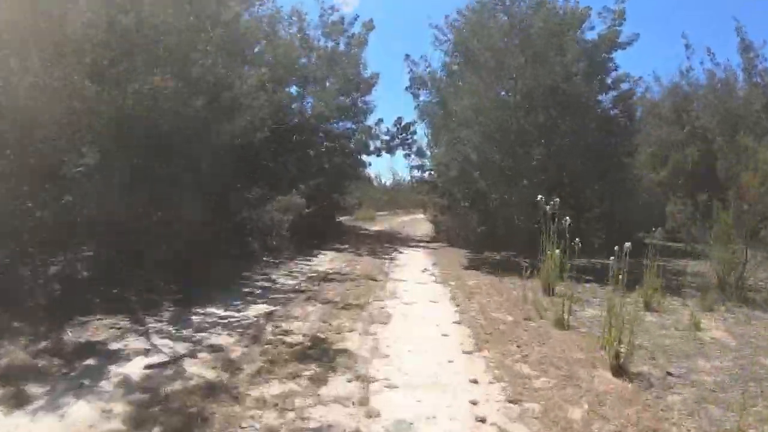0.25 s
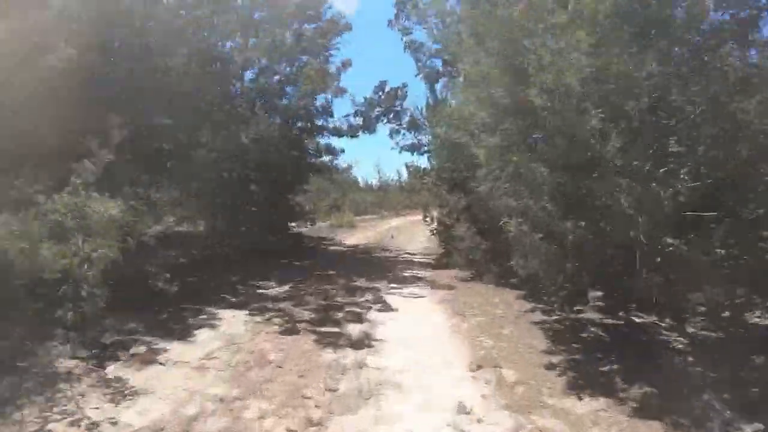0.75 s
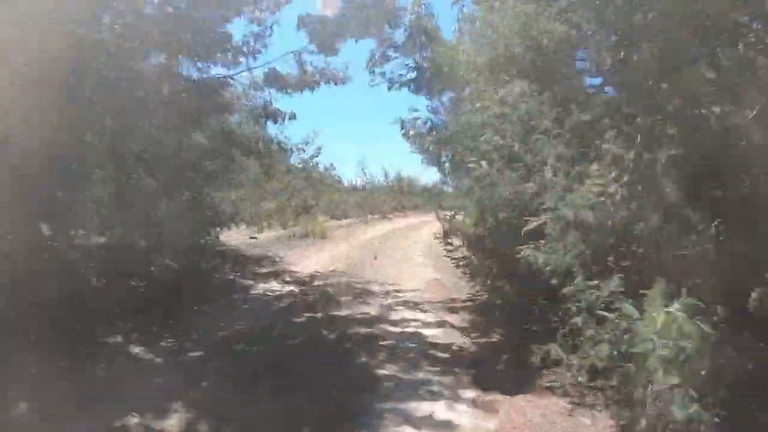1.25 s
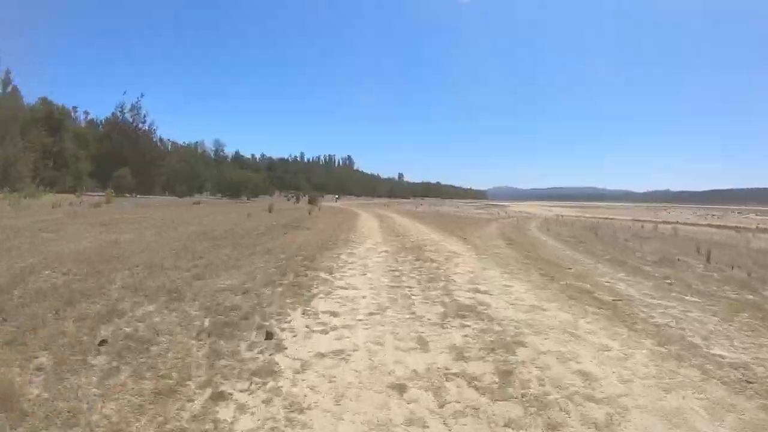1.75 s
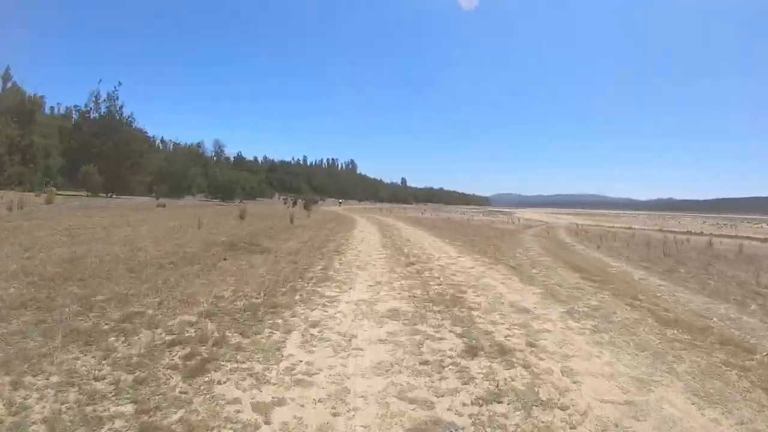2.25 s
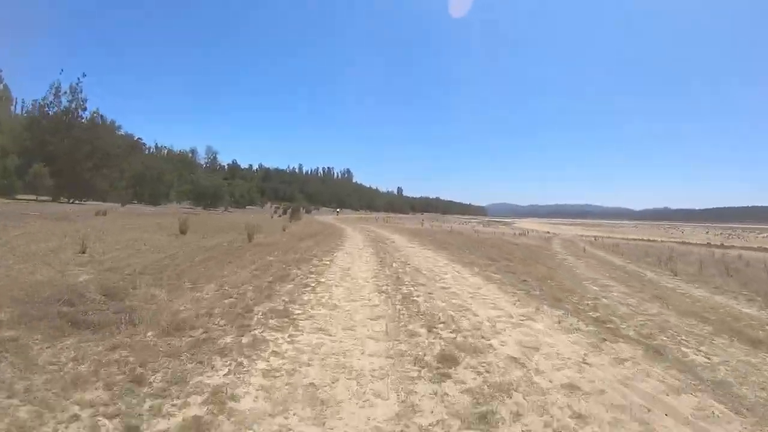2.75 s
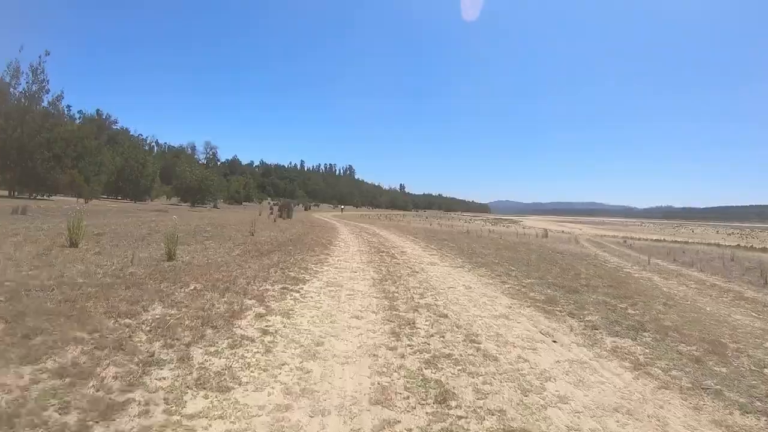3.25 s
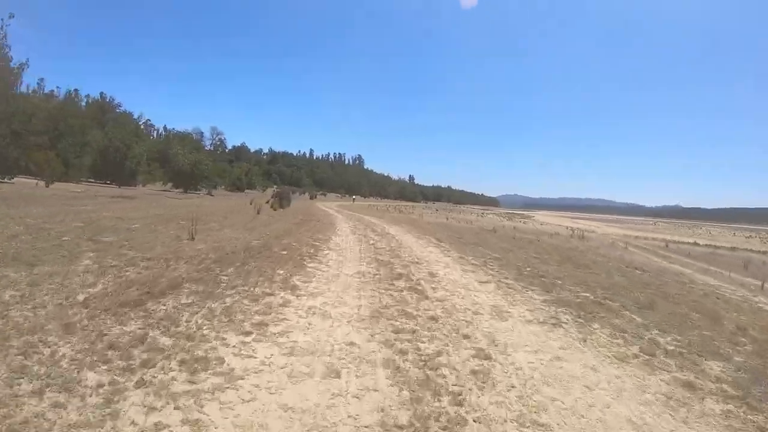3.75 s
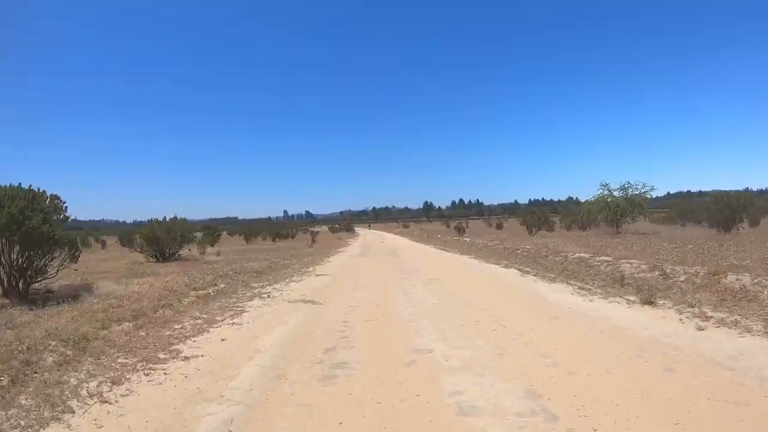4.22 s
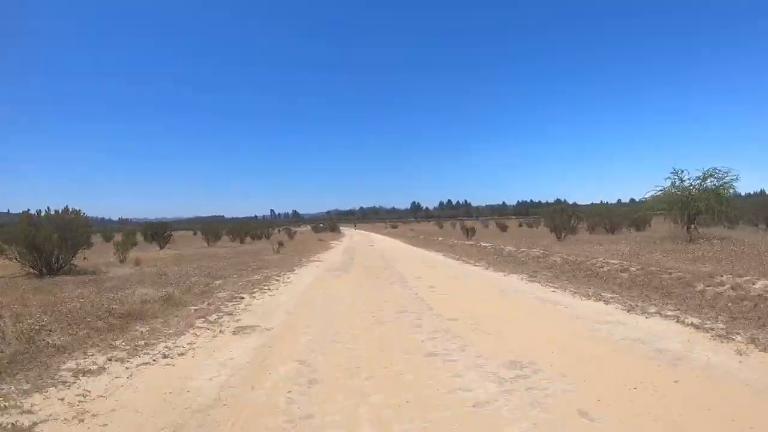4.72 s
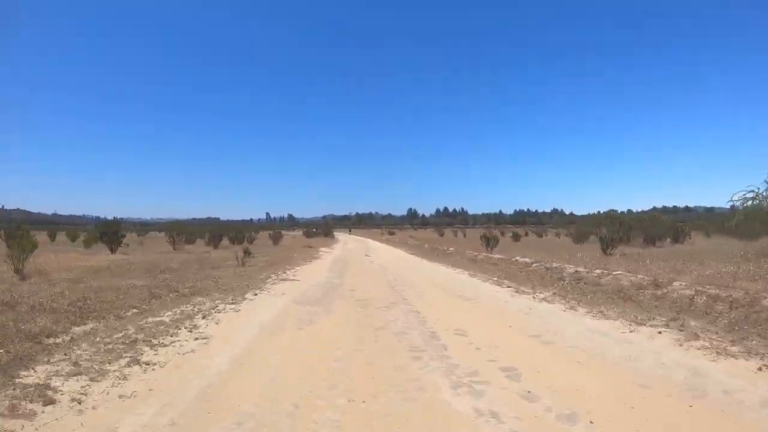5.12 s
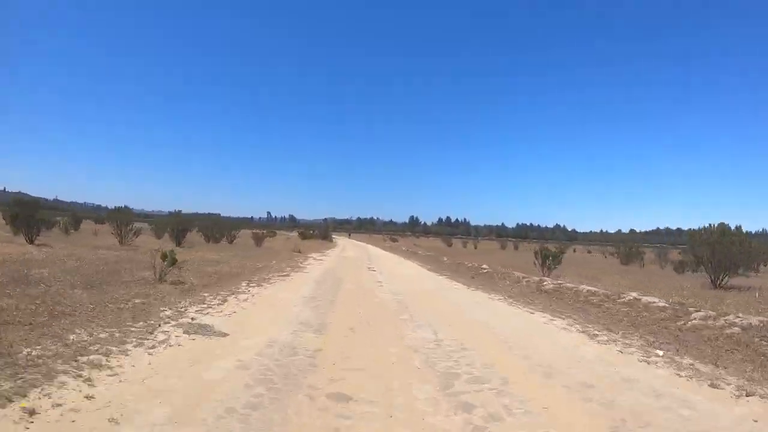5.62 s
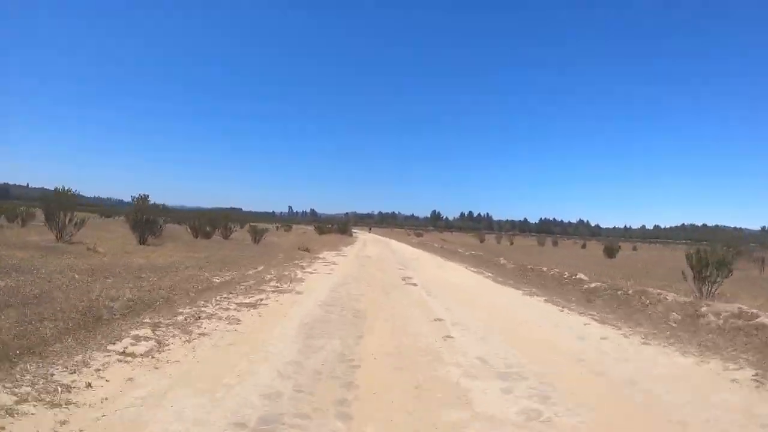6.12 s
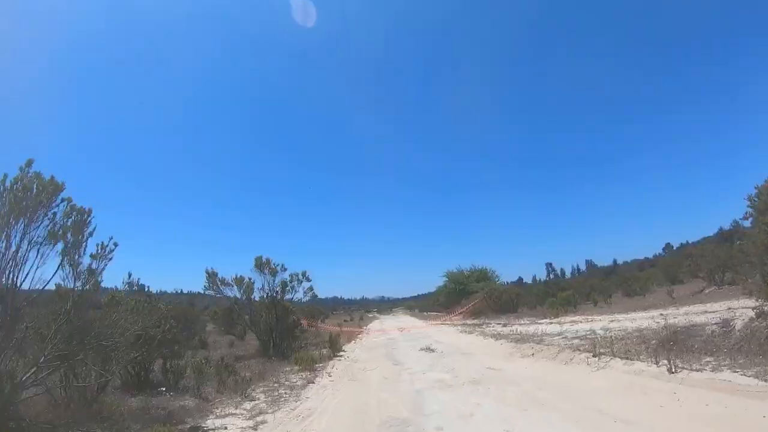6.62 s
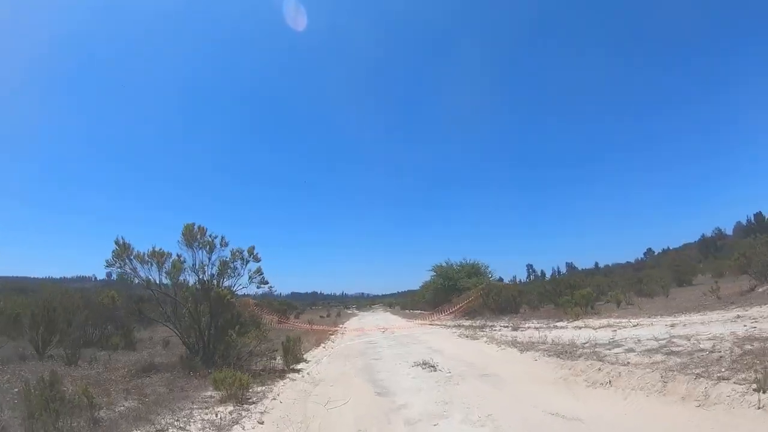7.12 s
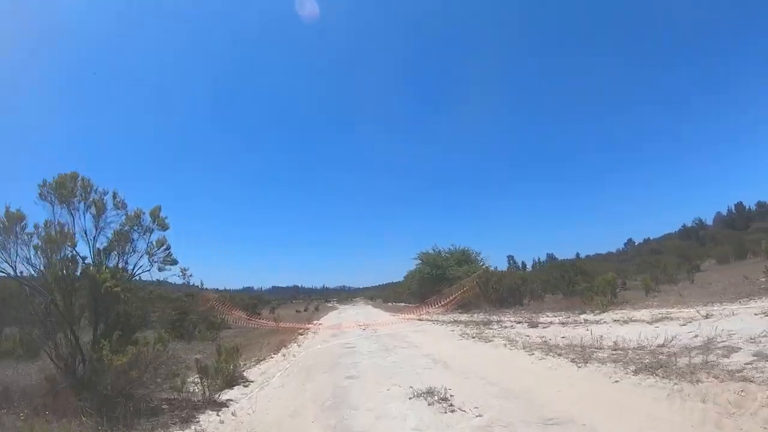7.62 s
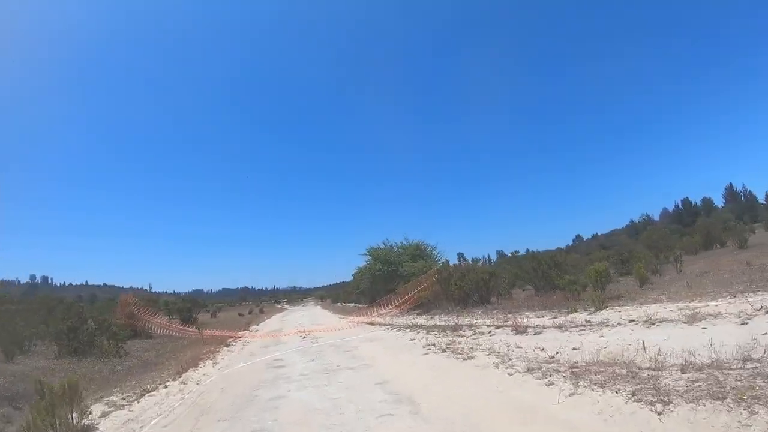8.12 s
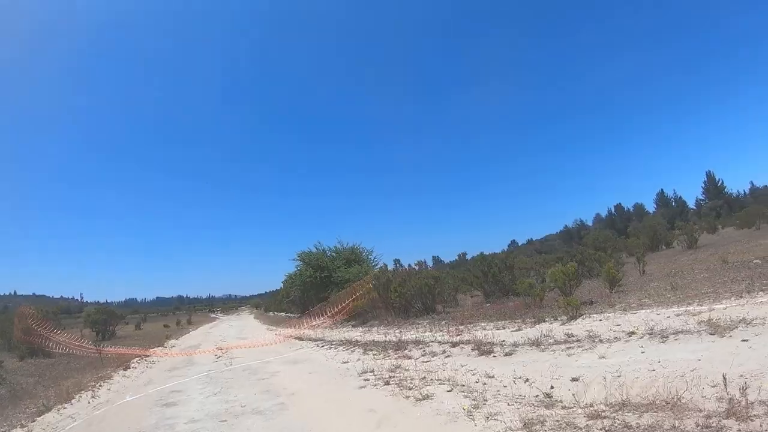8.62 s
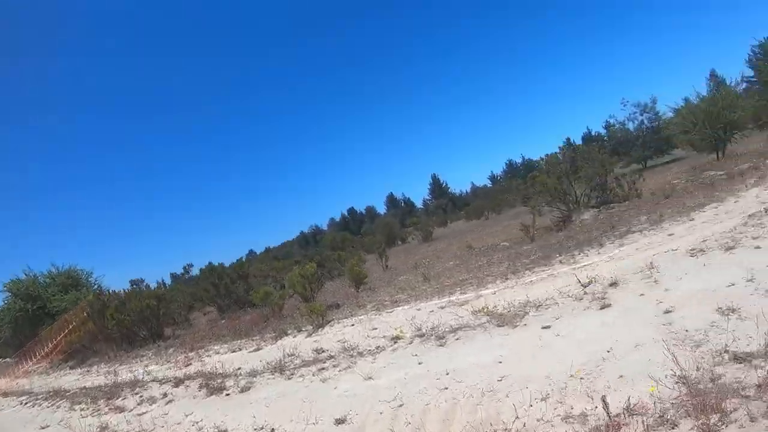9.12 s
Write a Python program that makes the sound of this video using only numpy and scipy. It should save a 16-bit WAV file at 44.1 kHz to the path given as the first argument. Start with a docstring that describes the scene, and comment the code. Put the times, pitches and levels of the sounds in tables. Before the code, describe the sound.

A bicycle rolls over dirt and gravel, tyres booming and frame rattling, stones snapping sharply under the wheels while wind buffets the microphone.

```python
"""A knock and the snap of stones come first, over the boom of tyres and a crunch of gravel.
A bicycle rolls over dirt, sand and gravel, heard from the bicycle itself, with wind in the microphone.
Random small contacts set the tyres, frame, pebbles and grit ringing; listed bumps and stones stand out.
Wind, sand hiss and a bright sizzle are shaped noise; the hum, thin high bands and drones are narrow noise.
A shared shaking curve makes the ground sounds swell together."""
import sys
import numpy as np
from scipy import signal
from scipy.fft import rfft, irfft, next_fast_len
from scipy.io import wavfile
from scipy.ndimage import uniform_filter1d, map_coordinates

SR = 44100
rng = np.random.default_rng(int(sys.argv[2]) if len(sys.argv) > 2 else 0)


def output_pcm(signal):
    """Save a mono or channel-first signal as 16-bit PCM at the path in sys.argv[1].

    Samples are clipped to [-1, 1] before scaling.
    """
    pcm = np.clip(np.atleast_2d(signal).T, -1, 1) * 32767
    wavfile.write(sys.argv[1], SR, np.round(pcm).astype(np.int16))


N = 412769

# Colour of the faint hiss of the air. Each row: pitch in Hz, relative level in dB.
AIR_COLOUR = [(760, -20), (1100, 0), (1600, 6.5), (2150, 3.5), (2800, -8.5), (3200, -8), (3600, -2.5),
              (4600, 2), (5300, -14.5), (5800, -19), (6900, -31), (7800, -28), (9000, -42), (15400, -84.5)]
# Loudness of that hiss before its flutter. Each row: time in seconds, level in dB.
AIR_LEVEL = [(8.4, -57), (8.85, -53), (9.15, -56.5)]
# Colour of the deep wind buffeting. Each row: pitch in Hz, relative level in dB.
BUFFET_COLOUR = [(12, 5), (25, 2.5), (42, 6), (62, 3.5), (95, -4.5), (200, -12), (400, -65.5)]
# Colour of the higher wind rush. Each row: pitch in Hz, relative level in dB.
RUSH_COLOUR = [(100, -11), (180, -2), (260, -4.5), (400, -11), (640, -18), (800, -43.5), (1200, -34),
               (2500, -56)]
# Deep drones. Each row: start and end in seconds, centre in Hz, width in Hz, level in dB before flicker.
DRONES = [(7.75, 8.58, 158, 24, -34), (8.14, 8.37, 47, 10, -34), (8.55, 8.92, 51, 11, -34)]
# Faint, thin high bands of noise. Each row: start and end in seconds, centre in Hz, width in Hz,
# level in dB before flicker.
THIN_BANDS = [(.95, 2.4, 6200, 300, -61), (7.32, 8.4, 6200, 300, -60.5), (7.1, 8.1, 5370, 150, -64),
              (8.38, 8.92, 6290, 240, -61), (8.38, 8.95, 5480, 190, -62), (8.38, 8.95, 3570, 260, -63),
              (7.3, 8.6, 4300, 1100, -58.5)]
# Loudness of the bright sizzle before flicker and shaking. Each row: time in seconds, level in dB.
SIZZLE_LEVEL = [(3.96, -78), (4.0, -45.5), (6.15, -47.5), (6.45, -57), (7.3, -76)]
# Colour of the sizzle. Each row: pitch in Hz before the slow sag, relative level in dB.
SIZZLE_COLOUR = [(3450, -26), (3850, -.5), (4120, 2.5), (4500, -20), (5150, -14), (5450, -2), (5900, 2),
                 (6600, 3.5), (7000, -32)]
# Hum of the tread. Each row: time in seconds, level in dB, pitch in Hz before it wavers.
TREAD_HUM = [(7.45, -45, 366), (7.6, -30.5, 360.8), (8.3, -36.5, 334.6), (8.55, -47.5, 338),
             (8.75, -37, 347), (9.3, -42.5, 360)]
# The course of the ride, before shaking and chance. Each row: time in seconds, then levels in dB of
# tyre boom, frame rattle, crunch, wind buffeting, wind rush.
RIDE = [(0, -21.5, -30, -43.5, -26, -32), (1.1, -26, -35, -47.5, -29.5, -31.5),
        (1.6, -20, -28, -40.5, -24, -34), (3.0, -20, -31, -39, -24.5, -33),
        (3.95, -20, -29.5, -40, -23.5, -34), (4.02, -29.5, -33.5, -43, -26.5, -28),
        (4.8, -26, -26, -39, -20, -25), (5.7, -27, -24.5, -37, -20.5, -24.5),
        (6.6, -28.5, -28, -40, -22, -28.5), (7.0, -19, -34, -43, -32, -36.5),
        (7.45, -23, -30.5, -45, -31, -27), (7.6, -26.5, -38.5, -50.5, -28.5, -29),
        (8.45, -28.5, -49.5, -61.5, -41, -41), (8.7, -32, -39.5, -56, -37.5, -35),
        (9.2, -52, -45.5, -76.5, -31, -48.5), (9.3, -21.5, -36, -51.5, -21, -53)]
# Stonier (+) and smoother (-) patches. Each row: start in seconds, length in seconds,
# shaking in dB, which each sound follows in its own measure.
PATCHES = [(0.054, 0.32, -1), (0.438, 0.069, 3), (0.661, 0.276, 2.5), (1.026, 0.13, -2),
           (1.203, 0.115, 3.5), (1.909, 0.059, -10.5), (3.893, 0.089, -6), (6.712, 0.11, 3),
           (7.425, 0.096, -10.5), (8.604, .14, -9.5), (9.03, 0.056, 4.5)]
# Bumps that shake the frame. Each row: time in seconds, then levels in dB of
# frame knock, fittings clack and tyre thud, each before its share in the mix.
BUMPS = [(0.009, -16, -18.5, -20), (0.376, -12, -23.5, -18), (0.469, -12, -21, -20),
         (0.624, -15.5, -30, -33), (0.74, -9, -26, -16), (0.778, -12.5, -24, -15), (0.854, -12, -19, -35),
         (1.215, -9, -23, -20), (1.271, -9.5, -36, -24), (1.367, -11, -21.5, -25), (1.469, -25, -29, -41),
         (1.884, -10, -30, -19.5), (1.997, -14.5, -27, -26), (2.192, -15, -27, -43),
         (2.464, -11.5, -22, -26), (2.566, -20, -26, -37), (2.909, -9.5, -40.0, -23),
         (3.016, -11.5, -16.5, -38), (3.135, -11, -19, -34.5), (3.35, -10, -22, -28),
         (3.495, -16, -20, -21), (3.652, -24, -22, -19), (4.019, -10, -35, -25), (4.246, -10.5, -18, -44),
         (4.339, -12.5, -22, -28), (4.769, -10, -33, -40), (4.899, -9.5, -35.5, -37),
         (5.146, -10, -24, -39), (5.318, -11, -23, -37), (5.665, -9, -29, -18), (5.728, -18, -35, -31),
         (5.835, -13, -29, -34.0), (5.919, -25, -24, -25), (6.086, -12.5, -18, -24), (6.385, -6, -21, -37),
         (6.547, -6.5, -39.0, -19), (6.734, -12.5, -19, -16), (6.922, -14, -20, -15),
         (7.361, -14, -22, -33.0), (7.399, -18, -33, -23), (7.55, -12, -19.5, -24), (7.67, -15, -36, -45),
         (7.79, -14.5, -25, -38), (7.968, -20, -30, -42), (8.012, -16, -28, -17.5),
         (8.089, -20.0, -34, -29.5), (8.295, -13, -29, -35), (8.402, -21.5, -30, -28),
         (8.475, -22, -25.5, -36), (8.502, -19.5, -32, -28), (8.756, -19.0, -42.0, -37),
         (8.802, -30, -27, -26), (9.029, -25, -35, -28)]
# Tyre and fork resonances. Each row: pitch in Hz, strength in dB before scatter,
# time to fade by 60 dB in seconds.
TYRE_MODES = [(84, -5, 0.054), (103.2, -0.5, 0.12), (121.7, 1.5, 0.086), (151.9, -2.5, 0.1)]
# Frame resonances. Each row: pitch in Hz, strength in dB before scatter, 60 dB fade in seconds.
FRAME_MODES = [(328.6, -2, 0.037), (441, -0.5, 0.049), (529.3, 3.5, 0.042), (639.6, 2.5, 0.027),
               (905, -17, 0.0091)]
# Clack of the fittings. Each row: pitch in Hz, strength in dB before scatter, 60 dB fade in seconds.
FITTING_MODES = [(770, 5, 0.0084), (1090, 5, 0.0057), (1190, -1, 0.013), (1485, 1, 0.018), (2115, 2, 0.017)]
# Colour of the sand hiss. Each row: pitch in Hz, relative level in dB.
SAND_COLOUR = [(900, -14), (1200, 3), (1600, 6), (2200, 2), (2900, -6), (3700, -2), (4650, -1), (5200, 3.5),
               (6100, 5.5), (6900, -31), (11500, -56)]
# Larger pebbles knocked aside. Each row: time in seconds, level in dB.
PEBBLES = [(.447, -29), (.986, -28), (1.185, -29), (1.232, -27), (1.271, -24), (1.304, -25), (1.422, -28),
           (1.468, -28), (1.559, -26), (1.877, -28), (2.019, -23), (2.192, -29), (2.823, -28), (3.126, -27),
           (3.387, -28), (3.481, -26), (5.006, -26), (5.669, -17), (5.835, -16), (6.346, -29), (7.625, -32)]
# Dull pebble resonances. Each row: typical pitch in Hz, strength in dB before scatter,
# 60 dB fade in seconds.
PEBBLE_MODES = [(840, -0.5, 0.018), (1120, -11.5, 0.017), (1490, -7, 0.013), (2070, -17.5, 0.0076)]
# Loudest single grains that split. Each row: time in seconds, level in dB before its share in the mix.
GRAINS = [(0.3594, -25.5), (0.6732, -22.5), (0.751, -23), (0.7974, -18.5), (0.8579, -23), (0.9717, -27),
          (1.3027, -22), (1.3508, -19.5), (1.392, -26), (1.509, -29), (1.5638, -29), (1.5758, -22),
          (1.617, -26), (1.721, -21.5), (1.7676, -22), (1.9139, -19.5), (1.9721, -21), (2.0353, -30.5),
          (2.1211, -23.5), (2.2101, -15), (2.2622, -18.5), (2.3075, -19), (2.3632, -21.5), (2.3784, -22.5),
          (2.4693, -29), (2.597, -30), (2.7147, -19), (2.7716, -22), (2.832, -18.5), (2.8702, -21),
          (2.8772, -18), (2.9153, -24), (2.9338, -19), (3.018, -22), (3.051, -18), (3.1776, -22),
          (3.245, -23), (3.2937, -32), (3.54, -22.5), (3.5865, -22), (3.71, -18.5), (3.8058, -17),
          (3.8891, -22.5), (4.0644, -20), (4.1108, -18), (4.119, -21), (4.365, -23), (4.7511, -19),
          (4.8152, -20), (4.897, -18.5), (5.228, -17.5), (5.4535, -22), (5.4697, -21), (5.5079, -17.5),
          (5.5706, -18), (5.8888, -19), (5.9644, -15.5), (6.0593, -13.5), (6.0766, -19), (6.2936, -16),
          (6.417, -14), (6.539, -20.5), (6.6774, -21.5), (6.734, -15.5), (6.8129, -21), (6.989, -26),
          (7.1412, -22.5), (7.2476, -22), (8.033, -36), (9.0266, -35)]
# Hollow clack of a stone. Each row: typical pitch in Hz, strength in dB before scatter,
# 60 dB fade in seconds.
CLACK_MODES = [(980, -14, 0.0069), (1334, -10, 0.012), (1914, -5.5, 0.009), (2277, -1.5, 0.0071)]
# Sharp crack of a stone or grain. Each row: typical pitch in Hz, strength in dB before scatter,
# 60 dB fade in seconds.
CRACK_MODES = [(2650, -8, .004), (3500, -9, .003), (4100, -2, .004), (4850, -2, .003), (5600, -1, .003),
               (6300, 0, .003), (7700, -7, .002), (8700, -7.5, .002), (10000, -15, .001)]
# Loudest stones snapping from under the tyres. Each row: time in seconds, snap level in dB before its
# share in the mix, ping pitch in Hz, level of the hollow clack in dB.
STONES = [(0.0122, -21, 4750.0, -35), (0.0319, -18.5, 6200, -24), (0.4627, -24, 6080, -30.5),
          (0.5505, -14.5, 4800, -29.5), (0.6299, -26, 4800, -41), (0.71, -23, 6260.0, -29),
          (0.734, -15, 4820, -22), (0.8085, -18.0, 6160, -35), (0.8215, -17.5, 4760.0, -35),
          (0.8743, -17, 4920, -46), (0.9272, -20, 4220, -30.5), (1.0806, -21, 4100, -36),
          (1.2262, -22, 6260, -38.5), (1.2587, -21, 4950, -35), (1.3816, -20, 6470.0, -36),
          (1.531, -18.5, 4760, -31.5), (1.5449, -21, 4900, -43), (1.6425, -19.5, 4100, -27),
          (1.7382, -20.5, 4500, -29.5), (1.79, -15, 6560, -25.5), (2.0835, -18, 4180, -26),
          (2.0935, -16.5, 3970, -34), (2.4355, -25.5, 4300, -24), (2.5747, -22.5, 4740, -31),
          (2.6134, -24, 4960, -29.5), (3.107, -17.5, 5820, -29), (3.1891, -23, 6000, -28),
          (3.2203, -20, 4620, -45), (3.2584, -23, 4660, -39), (3.2798, -13.5, 5950, -29),
          (3.3555, -24, 4500, -40), (3.3818, -21.5, 5170, -44), (3.4494, -21.5, 5530.0, -39),
          (3.5232, -17.5, 4700, -29), (3.6015, -22, 6060, -34), (3.6818, -21, 5430, -35),
          (3.8649, -15.5, 4630, -24), (4.0002, -9.5, 6030, -26.5), (4.0573, -7.5, 6450, -22),
          (4.2509, -16, 4000, -34), (4.2626, -14, 6400, -28), (4.3418, -19.5, 5800, -37),
          (4.411, -20.5, 6240, -34), (4.4757, -19, 6000, -33), (4.5752, -13, 4130, -24),
          (4.704, -9.5, 4070, -35), (4.7185, -12.5, 6250, -28), (4.7315, -12, 6060, -34),
          (4.8673, -18, 6460, -33), (4.983, -14.5, 5730, -28), (5.0331, -18.5, 4170, -27),
          (5.0819, -12.5, 6570, -20), (5.1283, -19.5, 5950, -24), (5.2284, -22.5, 3820.0, -29.5),
          (5.2475, -18, 6160.0, -24), (5.3261, -18.5, 4280, -26.5), (5.532, -20, 5900, -34.5),
          (5.549, -11, 4040, -22), (5.6073, -17.5, 3730, -41), (5.6222, -21.5, 4010.0, -27),
          (5.668, -21, 5700, -31), (5.6957, -16.5, 4150, -25.5), (5.7343, -11, 6300, -23.5),
          (5.7554, -12.5, 5830, -27), (5.8536, -13.5, 5860, -38), (5.9168, -18.5, 3810.0, -25),
          (5.9502, -19.5, 6050, -35.5), (6.0283, -12.5, 5700, -37.5), (6.3477, -19.5, 6280, -28),
          (6.4265, -8, 4130, -23), (6.5696, -10.5, 6140, -21), (6.6323, -23.5, 4130, -31),
          (6.7567, -22, 3990.0, -34), (6.7801, -20, 6440, -37), (6.828, -17, 4750, -35),
          (6.9263, -21, 4040, -28), (7.029, -36, 4180, -23), (7.219, -18.5, 4410, -33),
          (7.2578, -19.5, 5040.0, -28), (7.3985, -17.5, 4000, -27.5), (7.5591, -21, 5060, -33),
          (7.8941, -26, 4960, -33.5), (8.018, -32, 5200, -36), (8.407, -9, 4500, -23.5),
          (8.4584, -25, 6300, -36), (8.476, -32, 4300, -43), (8.8051, -29, 6110, -31),
          (9.0547, -27.5, 3830, -38)]

# narrow bands: fade length (s), spread of pitch (share) and of level (dB)
BAND_FADE_S, BAND_WAVER, BAND_FLICKER_DB = .12, .003, 2.2
HUM_WIDTH_HZ = 44
# the sizzle sinks in pitch: share per s, and the time (s) at which it has its listed colour
SIZZLE_SAG_PER_S, SIZZLE_MIDDLE_S = 0.022, 4
SIZZLE_FLICKER_DB, SAND_FLICKER_DB = 2.5, 3
HISS_SHAKES = 1.1  # dB of sand hiss and sizzle per dB of shaking
PATCH_EDGE_S = 0.01
# extra shaking at a listed hit: (dB, attack s, release s)
BUMP_JOLT, STONE_JOLT = (1.77, .005, 0.021), (2.3, 0.0036, 0.013)
UNEVEN_DB, UNEVEN_PER_S = .9, 10  # chance in plain ground: spread, and rate of change per s
SKIP_DB, SKIP_S = -2.2, 0.024  # lull before a bump: depth, and time constant of its onset
# crackle and sand follow the crunch: base levels where it is at GRAVEL_DB, then dB per dB
GRAVEL_DB = -41
CRACKLE_DB, CRACKLE_FOLLOWS = -56, 1.8
SAND_DB, SAND_FOLLOWS = -56.5, 0.6
PEBBLE_SIZE_RANGE = 1.25  # grinding pebbles differ in pitch by up to this factor either way
# small stones: strongest where the crunch is at GRAVEL_DB, range below it, clack against the snap (dB)
SMALL_STONE_DB, SMALL_STONE_RANGE_DB, SMALL_CLACK_DB = -28, 5.5, -8
# a stone: 60 dB fade of its ping (s), time for measuring a snap (s)
PING_T60, SNAP_S = .004, .003
BLUR_DB = -3.5  # level of the faint smear around a stone's main click, against that click
GRIT_DB, GRIT_S = -19.5, .0035  # grit after a stone: dB against its main click, mean delay
# a louder stone is blurred for longer: dB of length per dB, and the level with unchanged length (dB)
BLUR_FOLLOWS, BLUR_AT_DB = .15, -20
CUTOFF_HZ = 16000


def from_db(db):
    """Turn decibels into a gain."""
    return 10 ** (np.asarray(db) / 20)


def rms_one(x):
    """Scale a sound to an average strength (rms) of 1."""
    return x / np.sqrt(np.mean(x ** 2) + 1e-20)


def in_time(rows):
    """Draw straight lines between the rows, giving each column at every sample."""
    s, *columns = np.transpose(rows)
    return [np.interp(np.arange(N) / SR, s, c) for c in columns]


def drift(rate):
    """A curve that wanders by chance about zero with spread 1; a higher rate wanders faster."""
    step = 40  # samples between the points of the curve
    r = np.exp(-2 * np.pi * step * rate / SR)
    chance = rng.standard_normal(N // step + 2002)
    slow = signal.lfilter([1], [1, -2 * r, r * r], chance)[2000:]
    return np.interp(np.arange(N) / step, np.arange(len(slow)), rms_one(slow))


def steady(x, seconds):
    """Even out the strength to 1 over stretches of this length; quicker detail stays."""
    power = uniform_filter1d(x ** 2, max(int(seconds * SR), 2))
    return x / np.sqrt(np.abs(power) + 1e-12)


def soften(x, hz):
    """A soft contact or a dull surface passes little above this pitch."""
    lowpass = signal.butter(2, min(hz, .45 * SR), fs=SR, output="sos")
    return signal.sosfilt(lowpass, x + 1e-18)


def noise(colour):
    """Noise with a smooth colour and an rms of 1."""
    hz, db = np.transpose(colour)
    size = next_fast_len(N)
    bins = np.maximum(np.fft.rfftfreq(size, 1 / SR), 1)
    gain = from_db(np.interp(np.log(bins), np.log(hz), db))
    return rms_one(irfft(rfft(rng.standard_normal(size)) * gain, size)[:N])


def wavering(hz, width_hz):
    """Slow noise carried on a wavering pitch makes a narrow band with an rms of 1."""
    phase = 2 * np.pi * np.cumsum(hz * (1 + BAND_WAVER * drift(3.3))) / SR
    a, b = soften(soften(rng.standard_normal((2, N)), .5 * width_hz), .5 * width_hz)
    return rms_one(a * np.cos(phase) + b * np.sin(phase))


def narrow_band(start, end, hz, width_hz, db):
    """A narrow, wavering and flickering band that fades in and out."""
    t = np.arange(N) / SR
    fade = np.clip(np.minimum(t - start, end - t) / BAND_FADE_S + .5, 0, 1)
    return from_db(db + BAND_FLICKER_DB * drift(7.3)) * fade * wavering(hz, width_hz)


def ring(clicks, hz, t60):
    """A unit click starts a fading tone of height about 1; little passes below the resonance."""
    r, w = from_db(-60 / (t60 * SR)), 2 * np.pi * hz / SR
    return signal.lfilter([.5, 0, -.5], [1, -2 * r * np.cos(w), r * r], clicks + 1e-18)


def strike(clicks, modes, scatter_db, detune=1):
    """Every contact excites each resonance with a strength of its own."""
    at, out = np.flatnonzero(clicks), np.zeros(len(clicks))
    for k, (hz, db, t60) in enumerate(modes):
        force = np.zeros(len(clicks))
        force[at] = clicks[at] * from_db(db + scatter_db * rng.standard_normal(len(at)))
        out += ring(force, hz * detune, t60) * (-1) ** k
    return out


def contacts(per_s, spread_db):
    """Contacts at random moments, many small and a few large, pushing either way."""
    sizes = from_db(spread_db * np.minimum(rng.exponential(1, N), 4)) * rng.choice([-1, 1], N)
    return sizes * (rng.random(N) < per_s / SR)


def burst(seconds, after_db, count, size):
    """One contact followed by random rebounds that die away."""
    force, delays = np.zeros(size), rng.exponential(1, count)
    at = np.minimum(1 + (delays * seconds * SR).astype(int), size - 1)
    force[at] = from_db(after_db) * rng.standard_normal(count) * np.exp(-delays / 2)
    force[0] = rng.choice([-1, 1])
    return force


def snap_level(x, seconds):
    """Scale a short sound so that its energy equals an rms of 1 over this time."""
    return x / np.sqrt(np.sum(x ** 2) / (seconds * SR) + 1e-20)


def add(out, s, sound):
    """Mix a sound in at a time in seconds."""
    at = int(np.clip(s * SR, 0, N - 1))
    out[at:at + len(sound)] += sound[:N - at]


def air():
    """A faint, fluttering hiss that does not follow the ground."""
    level_db, = in_time(AIR_LEVEL)
    return from_db(level_db + 2.0 * drift(27)) * noise(AIR_COLOUR)


def wind(buffet_db, rush_db):
    """Large eddies push slowly on the microphone, small ones flutter past it."""
    buffet = from_db(buffet_db + 2.0 * drift(5.5)) * steady(noise(BUFFET_COLOUR), 0.11)
    rush = from_db(rush_db + 2.84 * drift(36)) * noise(RUSH_COLOUR)
    return buffet + rush


def drone():
    """Narrow bands of low noise make deep drones that come and go."""
    return sum(narrow_band(*row) for row in DRONES)


def thin_bands():
    """Faint, thin high bands of noise fade in and out."""
    return sum(narrow_band(*row) for row in THIN_BANDS)


def sizzle(level_db):
    """Noise read ever more slowly gives a bright, flickering sizzle that sinks in pitch."""
    speed = 1 - SIZZLE_SAG_PER_S * (np.arange(N) / SR - SIZZLE_MIDDLE_S)
    sinking = map_coordinates(noise(SIZZLE_COLOUR), [np.cumsum(speed)], order=3, mode="mirror")
    flicker_db = SIZZLE_FLICKER_DB * (drift(90) + drift(7) / 2)
    return from_db(level_db + flicker_db) * sinking


def tread(hum_db, hum_hz):
    """On firm ground the tread gives a blurred hum with a gliding pitch."""
    return from_db(hum_db) * steady(wavering(hum_hz, HUM_WIDTH_HZ), 0.18)


def skips():
    """The wheel goes light before it lands in a bump: a deepening lull in the shaking, in dB."""
    out, t = np.zeros(N), np.arange(SR // 4) / SR
    for s, *_ in BUMPS:
        if s > t[-1]:
            add(out, s - t[-1], SKIP_DB * np.exp((t - t[-1]) / SKIP_S))
    return out


def jolts(rows, db, attack_s, release_s):
    """Extra shaking in dB sets in with each hit and dies away until the next hit takes over."""
    hits, t = np.sort(np.array(rows)[:, 0]), np.arange(N) / SR
    since = np.abs(t - hits[np.maximum(np.searchsorted(hits, t) - 1, 0)])
    return db * np.minimum(since / attack_s, np.exp((attack_s - since) / release_s))


def shaking():
    """How hard the ground shakes the bicycle, in dB: patches, skips, jolts and chance."""
    t = np.arange(N) / SR
    patches = np.zeros(N)
    for s, length, db in PATCHES:
        patches += db * np.clip(np.minimum(t - s, s + length - t) / PATCH_EDGE_S + .5, 0, 1)
    hits = jolts(BUMPS, *BUMP_JOLT) + jolts(STONES, *STONE_JOLT)
    return patches + skips() + hits + UNEVEN_DB * drift(UNEVEN_PER_S)


def frame(rattle_db):
    """The frame and its loose fittings chatter in clumps, dulled by the soft tyres."""
    chatter = strike(contacts(380 * from_db(4.0 * drift(16)), 4.24), FRAME_MODES, 4.43)
    return from_db(rattle_db) * steady(soften(soften(chatter, 950), 950), 0.087)


def bumps(shake_s, knock_db, clack_db, thud_db):
    """A bump comes through the soft tyre: the frame knocks, the fittings clack and the tyre thuds."""
    out = np.zeros(N)
    for s, frame_db, fittings_db, tyre_db in BUMPS:
        force = soften(soften(burst(shake_s, -3.3, count=7, size=6000), 3160), 5000)
        knock = from_db(frame_db + knock_db) * snap_level(strike(force, FRAME_MODES, 4.5), 0.011)
        clack = from_db(fittings_db + clack_db) * snap_level(strike(force, FITTING_MODES, 3.4), 0.0015)
        thud = from_db(tyre_db + thud_db) * snap_level(strike(force, TYRE_MODES, 4.5), 0.04)
        add(out, s, knock + clack + thud)
    return out


def tyres(boom_db):
    """Countless small lumps in the ground keep the tyres and fork booming."""
    boom = soften(strike(contacts(300, 3.26), TYRE_MODES, 3.4), 253)
    return from_db(boom_db) * steady(boom, 0.095)


def gravel(crunch_db, crackle_db, sand_db):
    """Pebbles of several sizes grind under the tread, fine grit cracks, and sand hisses."""
    pitches = np.geomspace(1 / PEBBLE_SIZE_RANGE, PEBBLE_SIZE_RANGE, 4)
    pebble_sound = sum(strike(contacts(110, 5.4), PEBBLE_MODES + CLACK_MODES, 4.1, p) for p in pitches)
    crunch = from_db(crunch_db) * steady(soften(pebble_sound, 1710), 0.29)
    # the same grains give a sharp crack and a faint hollow clack
    grit = contacts(260 * from_db(3.4 * drift(16)), 4.1)
    cracks = strike(grit, CRACK_MODES, 3.0) + from_db(-22.5) * strike(grit, CLACK_MODES, 5.1)
    crackle = from_db(crackle_db) * steady(cracks, 0.088)
    sand = from_db(sand_db + SAND_FLICKER_DB * drift(25)) * noise(SAND_COLOUR)
    return crunch + crackle + sand


def pebbles(grind_s, knock_db):
    """A pebble grinds against its neighbours in a short cluster of hollow knocks."""
    out = np.zeros(N)
    for s, level_db in PEBBLES:
        force = burst(grind_s, -6.0, count=10, size=3000)
        detune = np.exp(0.031 * rng.standard_normal())
        knocks = snap_level(strike(force, PEBBLE_MODES, 9.4, detune), 0.0052)
        add(out, s, from_db(level_db + knock_db) * knocks)
    return out


def grains(tick_db, clack_db, grit_db):
    """A grain splits in one sharp contact, each at a pitch of its own, and leaves a trace of grit."""
    out = np.zeros(N)
    for s, level_db in GRAINS:
        force = burst(GRIT_S / 2, grit_db, count=12, size=1200)
        detune = np.exp(0.058 * rng.standard_normal())
        tick = snap_level(strike(force, CRACK_MODES, 3.0, detune), SNAP_S)
        clack = snap_level(strike(force, CLACK_MODES, 1.5, detune), SNAP_S)
        add(out, s, from_db(level_db + tick_db) * (tick + from_db(clack_db) * clack))
    return out


def small_stones(gravel_db, count):
    """Stones met at random, more and louder in coarse gravel: rows like those of STONES."""
    luck, pitch, smallness = rng.random((count, 3)).T
    met = np.cumsum(from_db(1.2 * gravel_db))
    at = np.searchsorted(met, luck * met[-1])
    level_db = SMALL_STONE_DB + 2.5 * gravel_db[at] - SMALL_STONE_RANGE_DB * smallness
    return list(zip(at / SR, level_db, 4000 + 2400 * pitch, level_db + SMALL_CLACK_DB))


def stones(rows, blur_s, blur_db, ping_db, crack_db, clack_db):
    """A stone snaps in one short, blurred click that sounds a ping, a crack, a hollow clack and some grit."""
    out, lead, size = np.zeros(N), 300, 1800  # lead: samples kept free ahead of the main click
    for s, level_db, hz, hollow_db in rows:
        force = np.zeros(size)
        force[lead:] = from_db(GRIT_DB) * burst(GRIT_S, 0, count=24, size=size - lead)
        # a faint smear on both sides of the main click
        offsets = rng.laplace(0, 1, 16)
        spread_s = blur_s * from_db(BLUR_FOLLOWS * (level_db - BLUR_AT_DB))
        at = np.clip(lead + (offsets * spread_s * SR).astype(int), 0, size - 1)
        force[at] = from_db(blur_db) * rng.standard_normal(len(offsets)) * np.exp(-np.abs(offsets) / 2)
        force[lead] = rng.choice([-1, 1])
        detune = np.exp(0.071 * rng.standard_normal())
        ping = from_db(ping_db) * snap_level(ring(force, hz, PING_T60), SNAP_S)
        crack = from_db(crack_db) * snap_level(strike(force, CRACK_MODES, 4.0, detune), SNAP_S)
        clack = snap_level(strike(force, CLACK_MODES, 2.4, detune), SNAP_S)
        hollow = from_db(clack_db + hollow_db) * clack
        add(out, s - lead / SR, from_db(level_db) * (ping + crack) + hollow)
    return out


def scene():
    """Shaking raises tyres, frame, gravel, sizzle and wind rush together, all close and in the open air."""
    shake = shaking()
    boom_db, rattle_db, crunch_db, buffet_db, rush_db = in_time(RIDE)
    gravel_db = crunch_db - GRAVEL_DB
    sizzle_db, = in_time(SIZZLE_LEVEL)

    background = air() + wind(buffet_db, rush_db + 1.0 * shake) + drone() + thin_bands()
    background = background + sizzle(sizzle_db + HISS_SHAKES * shake)
    bicycle = tyres(boom_db + 1.66 * shake) + frame(rattle_db + 1.48 * shake) + tread(*in_time(TREAD_HUM))

    crackle_db = CRACKLE_DB + CRACKLE_FOLLOWS * gravel_db + 2.96 * shake
    sand_db = SAND_DB + SAND_FOLLOWS * gravel_db + HISS_SHAKES * shake
    ground = gravel(crunch_db + 2.06 * shake, crackle_db, sand_db)

    knocks = bumps(shake_s=.0025, knock_db=-9.5, clack_db=-3.0, thud_db=-3.0)
    knocks = knocks + pebbles(grind_s=0.002, knock_db=0.0)
    all_stones = list(STONES) + small_stones(gravel_db + .5 * shake, count=110)
    snaps = stones(all_stones, blur_s=0.0013, blur_db=BLUR_DB, ping_db=-12.0, crack_db=-10.0, clack_db=0.0)
    snaps = snaps + grains(tick_db=-10.5, clack_db=-4.5, grit_db=-5.0)
    return (background + bicycle + ground + knocks + snaps)[None]


def record(dry):
    """The housing muffles the highest treble, peaks are rounded and the top is cut."""
    muffling = signal.butter(8, 9900, fs=SR, output="sos")
    muffled = signal.sosfilt(muffling, dry) + from_db(-54.0) * dry  # a trace passes unmuffled
    rounded = 0.73 * np.tanh(muffled / 0.85)
    return signal.sosfilt(signal.butter(14, CUTOFF_HZ, fs=SR, output="sos"), rounded)


dry = scene()
out = record(dry)
output_pcm(out)
```